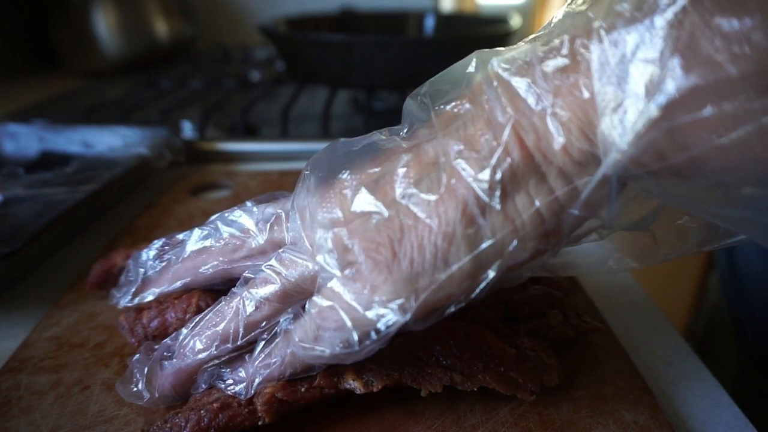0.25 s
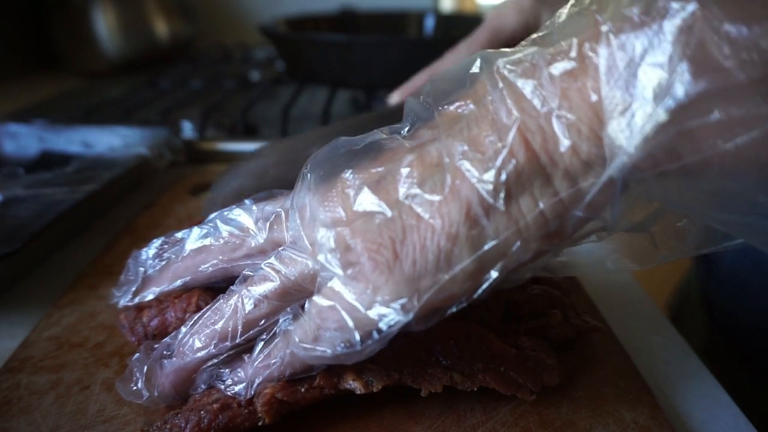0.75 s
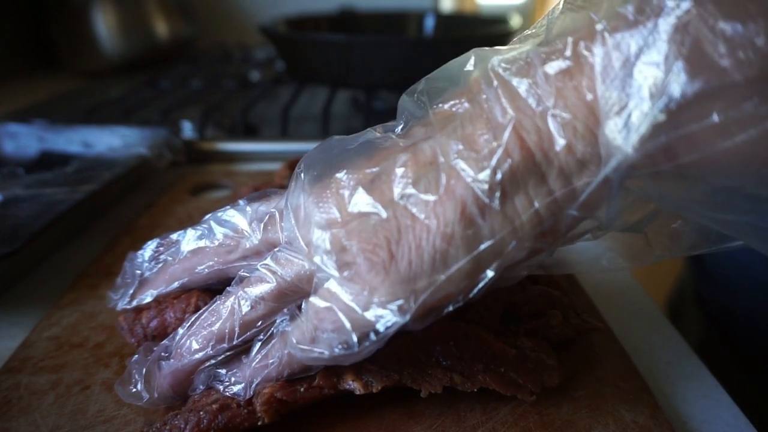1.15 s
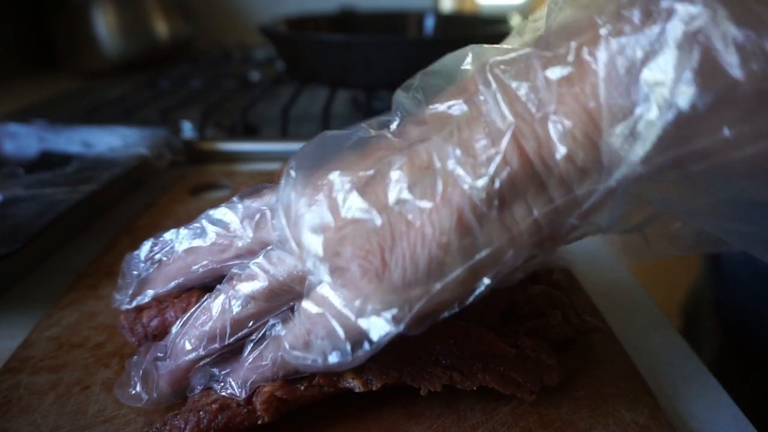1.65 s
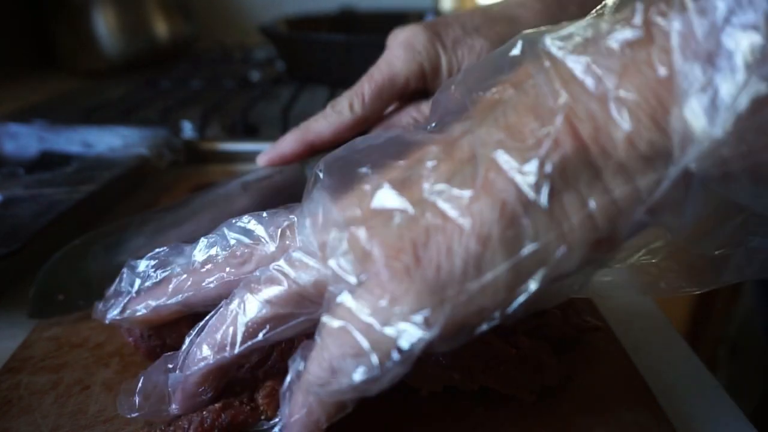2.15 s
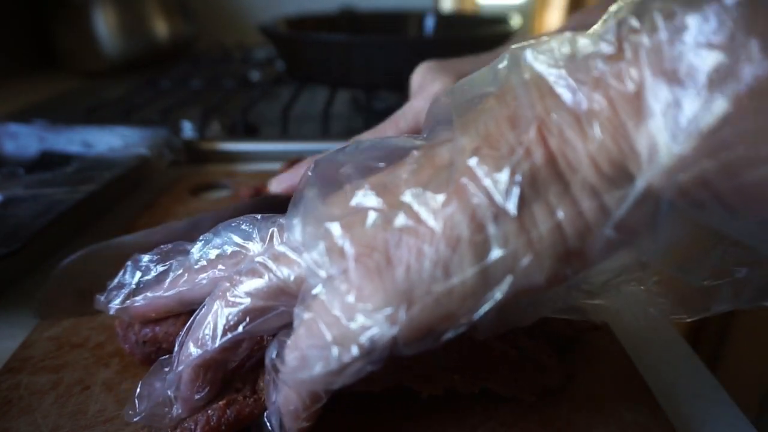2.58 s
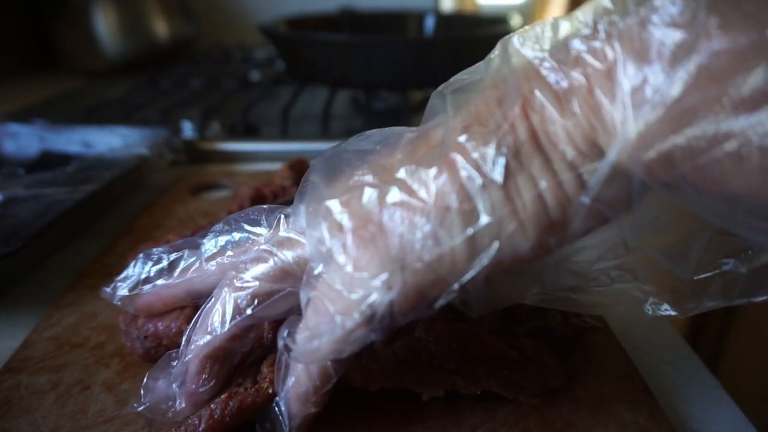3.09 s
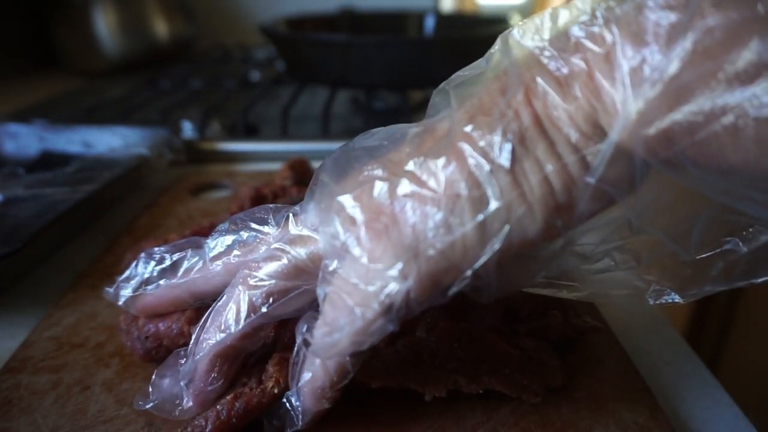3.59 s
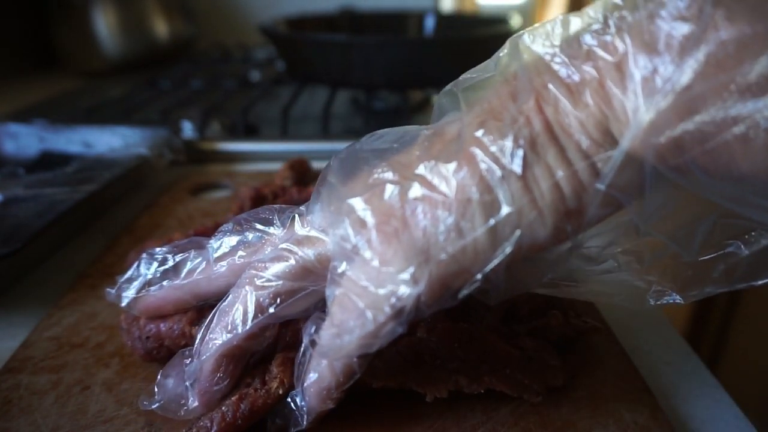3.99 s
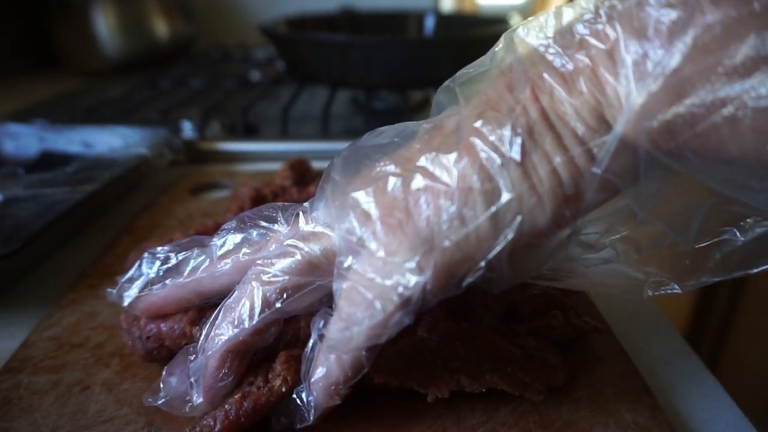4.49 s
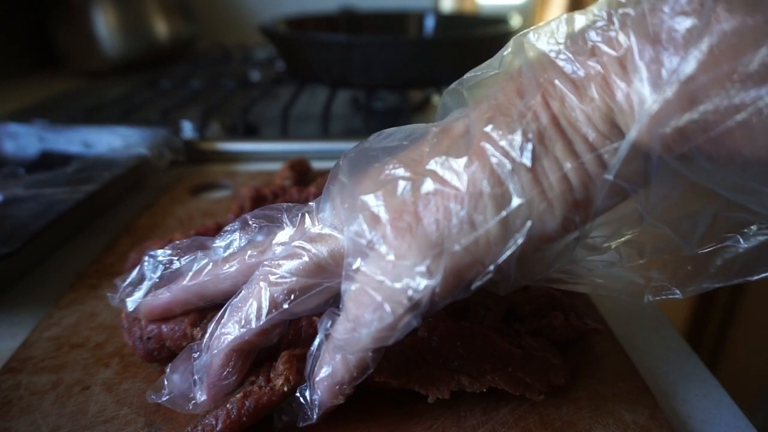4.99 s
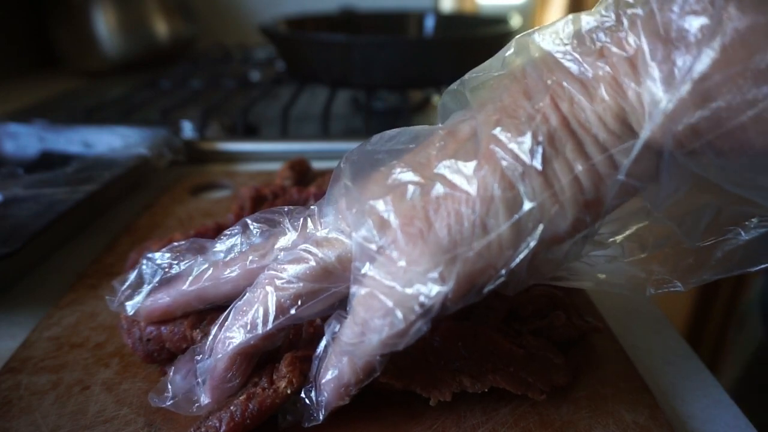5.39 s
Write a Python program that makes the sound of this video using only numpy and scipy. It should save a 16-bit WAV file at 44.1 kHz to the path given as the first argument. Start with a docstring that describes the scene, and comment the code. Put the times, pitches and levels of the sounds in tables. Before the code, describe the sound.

Very close, in a small kitchen, a dull knife saws raw meat on a wooden board. Two short strokes and a quick sideways scrape come first, then a few more strokes. The plastic glove rustles loudly as the grip shifts, the blade knocks the board, and steady sawing follows to the end with crisp crinkles and sharp snaps. The air is faint and the reverb short.

```python
"""A dull knife saws through raw meat on a wooden board, close by in a small kitchen.
Each stroke is a fizz of tearing fibres, hollowed by a resonance, over stick-slip grains rubbing the board.
Small smacks, one sideways scrape and one chattering knock are ringing modes and noise bursts.
A thin plastic glove on the holding hand crinkles and snaps, and rustles loudly when the grip shifts.
Early echoes, a short diffuse tail and faint filtered-noise air make up the room."""
import sys
import numpy as np
from scipy import signal
from scipy.fft import rfft, irfft
from scipy.io import wavfile

SR = 44100
rng = np.random.default_rng(int(sys.argv[2]) if len(sys.argv) > 2 else 0)


def wav_record(signal):
    """Record a signal, one row per channel, as 16-bit PCM in the file named by sys.argv[1]."""
    frames = np.transpose(np.atleast_2d(signal))
    bounded = np.clip(frames, -1, 1)
    # unit amplitude maps onto the largest positive 16-bit level
    quanta = np.round(bounded * 32767).astype(np.int16)
    wavfile.write(sys.argv[1], SR, quanta)


N = 248724
TIME = np.arange(N) / SR
LEFT, RIGHT = np.array([[1], [0]]), np.array([[0], [1]])

# blade strokes, each also flexing the glove; levels relative, gap = resonance beside the blade at top speed:
# top_speed_s, rise_s, fall_s, tearing_db, crinkle_db, gap_hz, overtone_re_gap_db
STROKES = [(.054, 0.1, 0.081, -42, -46, 3340, 5.5), (.138, 0.026, 0.062, -36, -41.5, 3000, -8),
           (1.09, 0.083, .07, -46.5, -46, 3020, 9.5), (1.18, .07, 0.093, -50.5, -39, 3150, -18),
           (1.255, 0.047, .055, -38.5, -51, 2900, -36), (1.32, 0.041, 0.14, -61, -48, 2760, -27),
           (2.605, 0.099, 0.042, -34.5, -39, 2580, -13), (2.778, .17, 0.091, -46, -37, 2830, -20),
           (2.91, .07, .075, -38, -38, 2580, -22), (3.065, 0.11, 0.084, -41.5, -38, 2630, -13),
           (3.23, 0.08, .1, -37, -37.5, 2820, -10), (3.395, 0.076, 0.092, -40, -43, 2800, -17),
           (3.581, 0.089, .14, -41, -41, 2500, -9), (3.795, 0.11, 0.075, -47, -47.5, 2480, -3),
           (4.037, 0.25, 0.38, -52, -49.5, 2400, -37), (4.295, 0.086, 0.12, -45.5, -41.5, 2260, -29),
           (4.501, 0.13, 0.065, -46, -38.5, 2320, -8), (4.608, 0.058, 0.044, -48, -46, 2340, -25),
           (4.742, 0.098, .1, -47, -37.5, 2400, -21), (4.89, 0.082, 0.16, -42, -39.5, 2280, -29),
           (5.152, 0.096, 0.11, -40, -40.5, 2370, -2.5), (5.325, 0.077, 0.091, -38, -39.5, 2400, -3),
           (5.42, 0.05, 0.079, -42, -42.5, 2880, 4.5), (5.545, 0.09, 0.11, -46, -37, 2860, 1)]


def amp(db):
    """Decibels to gain."""
    return 10 ** (np.asarray(db) / 20)


def panned(left_over_right_db):
    """Left and right gains, split evenly about 0 dB."""
    return amp(np.array([[left_over_right_db], [-left_over_right_db]]) / 2)


def read(points, hz):
    """Curve through (Hz, value) points, straight on a log-frequency axis."""
    f, value = np.transpose(points)
    return np.interp(np.log(hz + 1), np.log(f + 1), value)


def level(curve):
    """Gain over time from (s, dB) points, silent outside them."""
    return np.nan_to_num(amp(np.interp(TIME, *np.transpose(curve), left=np.nan, right=np.nan)))


def add(mix, s, sound):
    """Adds a stereo sound to the mix at time s."""
    part = mix[:, max(round(s * SR), 0):][:, :sound.shape[1]]
    part += sound[:, :part.shape[1]]


def add_sides(mix, left_s, right_s, sound):
    """Adds a sound with a separate arrival time on each side."""
    add(mix, left_s, sound * LEFT)
    add(mix, right_s, sound * RIGHT)


def convolve(x, response):
    """Passes both channels through a response, keeping the length."""
    return signal.oaconvolve(x, np.atleast_2d(response), axes=1)[:, :x.shape[1]]


def colour(x, spectrum):
    """Minimum-phase filter: causal, so clicks keep their sharp fronts."""
    log_gain = np.log(amp(read(spectrum, abs(np.fft.fftfreq(4096, 1 / SR)))))
    response = np.fft.ifft(np.exp(np.conj(signal.hilbert(log_gain)))).real
    return convolve(x, response[:2048])


def evened(x, band_hz):
    """Scales a stereo sound so that its mid channel has rms 1 within a band."""
    band_pass = signal.butter(4, band_hz, "band", fs=SR, output="sos")
    return x / np.std(signal.sosfilt(band_pass, x.mean(0)))


def resonate(x, hz, width_hz):
    """One-pole resonance of gain 1 that follows the curve hz, by shifting it to 0 Hz and back."""
    turn = np.exp(2j * np.pi * np.cumsum(hz) / SR)
    r = np.exp(-np.pi * width_hz / SR)
    return 2 * (turn * signal.lfilter([1 - r], [1, -r], x / turn + 1e-18)).real


def swell(s, rise_s, fall_s):
    """Speed of one push: a quarter sine up to its top at time s, and a quarter sine down."""
    u = (TIME - s) / np.where(TIME < s, rise_s, fall_s)
    return np.cos(np.pi / 2 * np.clip(u, -1, 1))


def uneven(depth_db, step_s):
    """Random gain of mean power 1: things catch and let go."""
    draws = rng.standard_normal(4096)
    wander = np.interp(TIME / step_s, np.arange(len(draws)), np.clip(draws, -2, 2))
    gain = amp(depth_db * wander)
    return gain / np.sqrt(np.mean(gain ** 2))


def crackle(count, spread_db, top_hz, ring_s, lead_s, scatter_s):
    """Tiny damped grains of random time, pitch and size, with a small random lag between the sides."""
    when, pitch, size, phase, place = rng.random((count, 5)).T[:, :, None]
    steps = np.arange(48)
    height = amp(-spread_db * np.log(np.maximum(size, .01)))
    lag = lead_s + scatter_s * (2 * place - 1)  # positive: right later
    at = ((when * N).astype(int) + steps).ravel()
    out = []
    for side in (-.5, .5):
        t = np.maximum((steps - 4) / SR - side * lag, 0)
        envelope = height * t / ring_s * np.exp(-t / ring_s)
        grains = envelope * np.cos(2 * np.pi * (top_hz * pitch * t + phase))
        out.append(np.bincount(at, grains.ravel(), N)[:N])
    return np.array(out)


def sawing():
    """Gains over time of the tearing meat and the flexing glove; both follow the blade's speed."""
    return sum(amp([[tear_db], [crinkle_db]]) * swell(s, rise, fall)
               for s, rise, fall, tear_db, crinkle_db, *_ in STROKES)


def gap_shape():
    """Resonance (Hz) and overtone (dB) of the gap over time, set by the stroke under way."""
    fall_octaves_per_s = 0.96  # each stroke opens the gap, so its resonance sinks
    weight, octave, upper_db = 0, 0, 0
    for s, rise, fall, tear_db, _, hz, overtone_db in STROKES:
        share = amp(tear_db) * swell(s, rise, fall) + 1e-9
        weight = weight + share
        octave = octave + share * (np.log2(hz) - fall_octaves_per_s * np.clip(TIME - s, -rise, fall))
        upper_db = upper_db + share * overtone_db
    return 2 ** (octave / weight), upper_db / weight


def slicing(tearing, gain_db, gap_db, overtone, width_hz, upper_width_hz):
    """Wet fibres tear one after another: a fine fizz, hollowed by the gap beside the blade."""
    # spectrum of tearing fibres: pitch_hz, relative level_db
    fibre_spectrum = [(100, -34), (300, -26), (600, -15.5), (1050, 1.5), (1500, -9.5), (2000, -1),
                      (2600, 0), (3500, 2), (4800, 2.5), (6500, -8), (10000, -6), (16000, -14)]
    grains = crackle(count=40000, spread_db=-0.5, top_hz=15800, ring_s=.00007,
                     lead_s=.00003, scatter_s=.00009)
    fibres = colour(grains, fibre_spectrum)
    hz, upper_db = gap_shape()
    hollow = resonate(fibres, hz, width_hz)
    hollow = hollow + amp(upper_db) * resonate(fibres, overtone * hz, upper_width_hz)
    fizz = evened(fibres + amp(gap_db) * hollow, (2000, 5000))
    return amp(gain_db) * tearing * uneven(depth_db=2.45, step_s=0.0072) * fizz


def smacks(ring_s, rise_octaves, lead_s):
    """Wet meat lets go of the blade: a small pocket opens and rings briefly with rising pitch."""
    # smacks: start_s, pitch_hz (one ring_s after the start), relative level_db
    pockets = [(0.7325, 2040, -46), (1.483, 2330, -44), (1.214, 2780, -41), (2.667, 3680, -27.5),
               (2.966, 1480, -39), (3.184, 2030, -30.5), (3.437, 2050, -38), (4.091, 1940, -34),
               (4.489, 1720, -31)]
    out, t = np.zeros((2, N)), np.arange(1024) / SR
    for s, hz, db in pockets:
        pitch_hz = hz * 2 ** (rise_octaves * (np.minimum(t / ring_s, 3) - 1))
        turns = np.cumsum(pitch_hz) / SR
        pop = amp(db) * np.exp(-t / ring_s) * np.sin(2 * np.pi * turns)
        add_sides(out, s, s + lead_s, pop)
    return out


def board_ring():
    """The board's answer to one tap: a sum of decaying modes."""
    # modes of the board with the blade on it: pitch_hz, relative level_db, t60_s
    modes = [(334, -8.5, 0.18), (460, -7, 0.034), (509.7, 1.5, 0.075), (545, -5, 0.071), (709, -0.5, 0.065),
             (765.5, 2.5, 0.19), (1048, 3.5, 0.076), (1795, 9.5, 0.031), (2010, -10, 0.01),
             (2613.6, -14, 0.028), (2627, -6, 0.19), (2830, 4, 0.06), (3370, -19, .025), (3880, -20, .03)]
    t = np.arange(SR // 4) / SR
    return sum(amp(db - 60 * t / t60) * np.cos(2 * np.pi * hz * t) for hz, db, t60 in modes)


def on_board(x, ring_db):
    """Contact noise together with the ringing that it stirs in the board."""
    ring = board_ring()
    return x + amp(ring_db) * convolve(x, ring / abs(rfft(ring)).max())


def rubbing(tearing, gain_db, pan_db, split_hz):
    """The edge sticks and slips on the wood: a thud through the meat, a grating where it is bare."""
    # spectrum of rubbed wood: pitch_hz, relative level_db
    rub_spectrum = [(40, -21.5), (130, -19), (220, -10), (340, -1), (520, -2.5), (750, 2), (1100, -4),
                    (1450, -4.5), (2300, -4.5), (3500, -23), (8000, -67)]
    # edge bearing down on the board: peak_s, length_s, relative level_db, grating_re_thud_db
    contacts = [(0.08, 0.025, -55, 18), (0.16, 0.069, -80, 15), (1.173, 0.027, -47.5, -18.5),
                (2.433, 0.076, -37, -6), (2.635, 0.041, -49.5, 10), (2.756, .08, -52.5, -17),
                (3.055, 0.16, -51.5, -1), (3.288, 0.052, -50.5, 12), (3.618, 0.11, -37.5, -2.5),
                (3.815, 0.13, -47.5, -7.5), (4.317, 0.11, -51, -8), (4.506, 0.017, -47, 9),
                (4.77, 0.1, -40, -1.5), (5.312, 0.11, -43, 10.5), (5.549, 0.019, -38.5, 8)]
    drag_db = -17  # light rub under every stroke
    slips = crackle(count=9000, spread_db=4.5, top_hz=2700, ring_s=0.000091,
                    lead_s=.00002, scatter_s=0.00018)
    wood = evened(colour(on_board(slips, ring_db=7.5), rub_spectrum), (200, 900))
    thud = signal.sosfiltfilt(signal.butter(3, split_hz, fs=SR, output="sos"), wood)
    grating = wood - thud
    out = amp(drag_db) * tearing * wood
    for s, length, db, bright_db in contacts:
        press = amp(db) * swell(s, length / 2, length / 2)
        out = out + press * (amp(-bright_db / 2) * thud + amp(bright_db / 2) * grating)
    return amp(gain_db) * panned(pan_db) * out


def sweep():
    """Speed of the sideways drag: one short bell."""
    peak_s, width_s = 0.3388, 0.013
    return np.exp(-.5 * ((TIME - peak_s) / width_s) ** 2)


def scrape(gain_db, pan_db, direct_db):
    """One quick sideways sweep of the edge over the grain: slips set the blade's resonances singing."""
    # blade dragged on its side: pitch_hz, width_hz, relative level_db
    blade = [(770, 27, 6), (903, 23, 2), (1647, 37, 5.5), (2550, 70, 6), (2650, 42, -2), (3120, 38, 1),
             (3900, 33, 7.5), (4250, 38, -5)]
    # spectrum of the scrape: pitch_hz, relative level_db
    scrape_spectrum = [(40, -29), (150, -28), (280, -22), (400, -4), (600, -3.5), (850, -3.5), (1300, -3),
                       (1630, -6.5), (1950, -5), (2500, -5), (4100, -2), (6000, -8.5), (10000, -12),
                       (16000, -25)]
    slips = crackle(count=30000, spread_db=2, top_hz=17000, ring_s=.00007,
                    lead_s=.00002, scatter_s=.00008)
    steel = sum(amp(db) * resonate(slips, np.full(N, hz), width) for hz, width, db in blade)
    wood = evened(colour(amp(direct_db) * slips + steel, scrape_spectrum), (200, 16000))
    return amp(gain_db) * panned(pan_db) * sweep() * wood


def knock(ring_db, crack_db, crack_s, lead_s, apart_db, pan_db):
    """The blade lands and chatters: each contact gives a dull noise crack and rings the board."""
    # contacts of the chatter: start_s, relative level_db
    landings = [(2.4379, -4), (2.4391, 0.5), (2.4422, -2), (2.4451, -5), (2.4495, -21)]
    # spectrum of the crack: pitch_hz, relative level_db
    crack_spectrum = [(40, -31), (150, -18), (240, -9), (340, -3.5), (700, -0.5), (1030, 6), (1450, -12),
                      (2200, 5.5), (3200, -3.5), (4500, -11), (8000, -22), (16000, -40)]
    out, ring = np.zeros((2, N)), board_ring()
    t = np.arange(len(ring)) / SR
    ring = signal.sosfilt(signal.butter(2, (200, 3800), "band", fs=SR, output="sos"), ring)
    ring = ring * (1 - np.exp(-t / crack_s))  # the board takes up the blow while the crack dies
    for s, db in landings:
        common, apart = rng.standard_normal((2, len(t)))
        noise = common + amp(apart_db) * apart * (LEFT - RIGHT)
        crack = colour(noise * np.exp(-t / crack_s), crack_spectrum)
        crack = crack / np.linalg.norm(crack.mean(0))
        blow = amp(db) * (amp(ring_db) * ring + amp(crack_db) * crack)
        add_sides(out, s, s + lead_s, blow)
    return out * panned(pan_db)


def hand_movement(flexing):
    """How hard the glove is worked: holding, strokes, settling, a jolt and one shift of grip."""
    # fingers settling on the meat: peak_s, length_s, relative level_db
    fidgets = [(0.427, .17, -50.5), (0.683, 0.062, -47), (0.975, 0.12, -47), (1.53, 0.18, -44.5)]
    # crinkle curve of the grip shift: time_s, relative level_db
    regrip = [(1.55, -46.5), (1.6, -25.5), (1.73, -31), (1.76, -36.5), (1.83, -30), (1.9, -35), (2.0, -32),
              (2.18, -32.5), (2.235, -38.5), (2.35, -37), (2.42, -32), (2.455, -47), (2.54, -43)]
    resting_db, jolt_db = -58, -39  # jolt: from the sideways scrape
    settling = sum(amp(db) * swell(s, length / 2, length / 2) for s, length, db in fidgets)
    jolt = amp(jolt_db) * sweep()
    power = amp(resting_db) ** 2 + flexing ** 2 + settling ** 2 + jolt ** 2 + level(regrip) ** 2
    return np.sqrt(power)


def glove(movement, rustle_db, pocket_hz, pocket_db):
    """Small creases buckle in clumps; as the hand moves faster they merge into a dense rustle."""
    # spectrum of the plastic film: pitch_hz, relative level_db
    film_spectrum = [(50, -39), (130, -35), (260, -24), (400, -16), (700, -8.5), (1100, -10), (1700, -6),
                     (3000, -3.5), (7000, -0.5), (10500, 1.5), (13500, 2), (16000, -4)]
    sparse = crackle(count=7000, spread_db=3.5, top_hz=16700, ring_s=.00006,
                     lead_s=.000035, scatter_s=.00004)
    dense = crackle(count=32000, spread_db=1.5, top_hz=18250, ring_s=.00006,
                    lead_s=.000035, scatter_s=.00005)
    sparse = sparse * uneven(depth_db=4.0, step_s=.006)
    merged = movement / (movement + amp(rustle_db))
    creases = np.sqrt(1 - merged) * sparse / sparse.std() + np.sqrt(merged) * dense / dense.std()
    # air pockets in the folds keep changing size, and colour the crinkle
    octaves = np.interp(TIME, np.linspace(0, N / SR, num=110), rng.uniform(-1, 1, size=110))
    creases = creases + amp(pocket_db) * resonate(creases, pocket_hz * 2 ** octaves, width_hz=670)
    crinkle = evened(colour(creases, film_spectrum), (8000, 16000))
    return movement * uneven(depth_db=1.5, step_s=.018) * crinkle


def stray_snaps(movement, count, over_db, spread_db, ceiling_db, body_db, width_db):
    """Further creases flip at random, louder with hand movement up to a ceiling; rows as for snaps()."""
    when, size, body, place = rng.random((count, 4)).T
    s = (np.arange(count) + when) / count * TIME[-1]
    movement_db = 20 * np.log10(np.interp(s, TIME, movement))
    db = np.minimum(movement_db + over_db, ceiling_db) - spread_db * size
    return list(zip(s, db, body_db + 10 * (2 * body - 1), width_db * (2 * place - 1)))


def snaps(rows, ring_s, flutter_db, flutter_s, lead_s, gain_db, body_db):
    """A crease flips with a sharp tick, and the film around it flutters briefly."""
    out, t = np.zeros((2, N)), np.arange(1024) / SR
    hz = np.fft.rfftfreq(len(t), 1 / SR)
    for s, db, body, pan_db in rows:
        flip, left, right = rng.standard_normal((3, len(t)))
        tick = flip * np.exp(-t / ring_s)
        late = irfft(rfft(tick) * np.exp(-2j * np.pi * hz * lead_s))  # right side
        flutter = np.array([left, right]) * np.exp(-t / flutter_s)
        snap = np.array([tick, late]) + amp(flutter_db) * flutter
        low_db = body + body_db
        snap = colour(snap, [(150, low_db - 20.0), (800, low_db - 12.0), (2500, low_db),
                             (7000, 1.5), (12000, 5.5)])
        snap = snap / snap[:, t < .003].std()
        add(out, s, amp(db + gain_db) * panned(pan_db) * snap)
    return out


def near_echoes(x):
    """Sound plus early reflections off the counter and nearby things, timed differently on each side."""
    # echoes: left_delay_s, right_delay_s, level_re_direct_db
    reflections = [(.0019, 0.00064, 0), (.0046, .0048, -9), (.0079, .0083, -14)]
    out = x.copy()
    for left_s, right_s, db in reflections:
        add_sides(out, left_s, right_s, amp(db) * x)
    return out


def kitchen(x, onset_s, mono_hz):
    """Short diffuse tail: each band dies at its own speed, and four echo paths fade in and out in turn."""
    # decay of the kitchen: pitch_hz, t60_s
    decay_times = [(100, 0.5), (350, 0.36), (1000, 0.19), (3000, 0.16), (8000, 0.081), (16000, 0.17)]
    turns_per_s = 5
    wet = np.zeros((2, N))
    for path in range(4):
        hz, t, z = signal.stft(rng.standard_normal((2, SR // 2)), SR, nperseg=256)
        same = 1 / (1 + (hz[:, None] / mono_hz) ** 2)  # the bass is alike on both sides
        z = np.array([z[0], same * z[0] + np.sqrt(1 - same ** 2) * z[1]])
        decay = amp(-60 * t / read(decay_times, hz)[:, None])
        tail = signal.istft(z * decay * (1 - np.exp(-t / onset_s)), SR, nperseg=256)[1]
        share = np.maximum(np.cos(2 * np.pi * (turns_per_s * TIME - path / 4)), 0)
        wet += convolve(x * share, tail / np.linalg.norm(tail[0]))
    return wet


def hush(db, likeness):
    """The faint steady air of the kitchen: filtered noise, partly shared between the sides."""
    # spectrum of the air: pitch_hz, relative level_db
    air_spectrum = [(25, -13), (60, -9), (150, -7), (330, 7), (550, 5), (780, 16), (1000, 8), (1230, 16.5),
                    (1600, 1), (4000, 5), (16000, -36)]
    common, left, right = rng.standard_normal((3, N))
    share = np.clip(likeness, 0, 1)
    air = colour(np.sqrt(share) * common + np.sqrt(1 - share) * np.array([left, right]), air_spectrum)
    return amp(db) * air / air.std()


def scene():
    """Knife and glove side by side in the kitchen."""
    # glove snaps at set times: start_s, relative level_db, relative 1-4 kHz body_db, left_over_right_db
    placed_snaps = [(0.0488, -21, -22, 6), (0.2559, -18.5, -16, 0.5), (0.4817, -23, -42, 3),
                    (0.506, -22.5, -34, 3), (0.639, -26, -15.5, -4), (0.733, -29, -6, 1.5),
                    (0.7572, -28.5, -18, -6), (0.8288, -34, -7, 3.5), (0.8809, -32.5, -9, -4),
                    (1.016, -15.5, -22.5, 0.5), (1.052, -27, -9, 5), (1.2309, -9, -14, -1),
                    (1.3528, -23, -27, 8), (1.5693, -33, -19, 1.0), (2.2584, -17.5, -33, 9),
                    (2.4024, -19.5, -11, -7), (2.649, -20.5, -20, -0.5), (2.6665, -17.5, -12, -3),
                    (2.828, -12, -41, -4), (2.8523, -16.5, -10.5, -3), (3.1535, -19, -31, 0.0),
                    (3.1833, -16, -22, -1.0), (3.5102, -30.5, -3, 7), (3.9845, -20.5, -15, -5),
                    (4.0183, -20.5, -21, -5), (4.0654, -21, -13.5, 1), (4.2327, -29, -7, -5),
                    (4.2659, -24, -14, -6), (4.8555, -19, -21, 4), (4.8802, -13, -21, 3.5),
                    (4.8836, -15.5, -15, -2), (5.5993, -16, -22, 5)]
    tearing, flexing = sawing()
    knife = slicing(tearing, gain_db=-3, gap_db=6.5, overtone=1.98, width_hz=510, upper_width_hz=1200)
    knife = knife + near_echoes(smacks(ring_s=.0015, rise_octaves=.08, lead_s=.00004))
    knife = knife + rubbing(tearing, gain_db=-1.5, pan_db=0.8, split_hz=650)
    knife = knife + scrape(gain_db=-24.5, pan_db=1.5, direct_db=-5)
    knife = knife + knock(ring_db=-31.0, crack_db=4.5, crack_s=0.00094, lead_s=.00005,
                          apart_db=-11, pan_db=0.5)

    movement = hand_movement(flexing)
    crinkle = glove(movement, rustle_db=-40.5, pocket_hz=6930, pocket_db=-4.0)
    flips = list(placed_snaps) + stray_snaps(movement, count=90, over_db=18.5, spread_db=5.5,
                                             ceiling_db=-17, body_db=-17.5, width_db=11.5)
    ticks = snaps(flips, ring_s=0.00042, flutter_db=-7, flutter_s=0.0021, lead_s=.000025,
                  gain_db=-10.5, body_db=14.5)
    plastic = amp(-0.5) * panned(0.9) * crinkle + near_echoes(ticks)

    wet = kitchen(amp(-6.5) * plastic + amp(-9.5) * knife, onset_s=0.00041, mono_hz=450)
    return knife + plastic + wet + hush(db=-57.5, likeness=0.06)


def record(dry):
    """Band limit: a linear-phase low-pass."""
    edge_hz = 16000
    low_pass = signal.firwin(511, edge_hz, window=("kaiser", 9), fs=SR)
    return signal.oaconvolve(dry, low_pass[None], "same")


dry = scene()
out = record(dry)
wav_record(out)
```